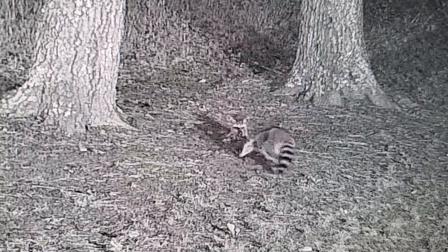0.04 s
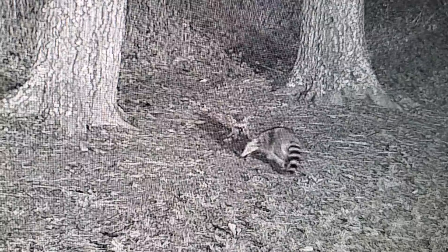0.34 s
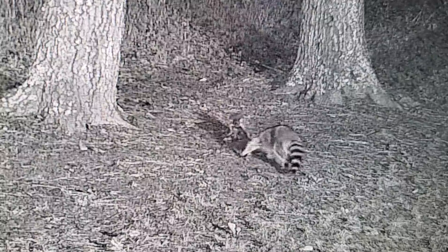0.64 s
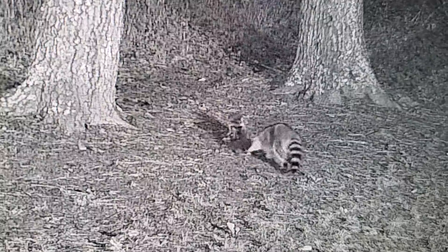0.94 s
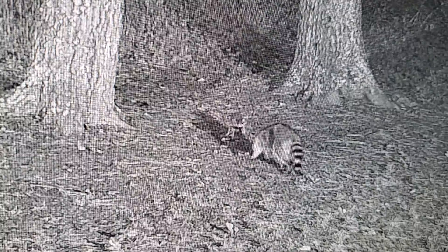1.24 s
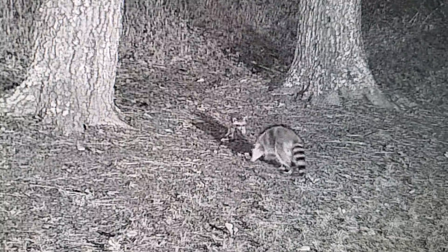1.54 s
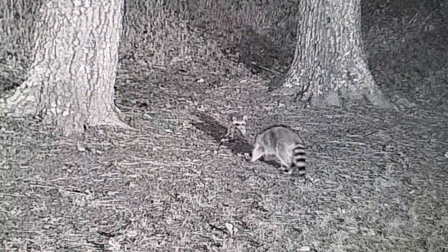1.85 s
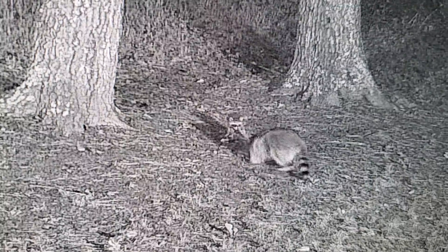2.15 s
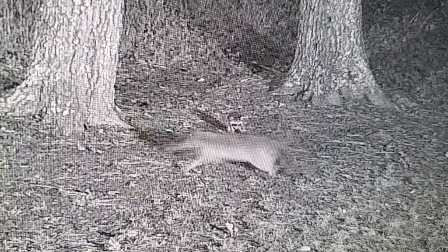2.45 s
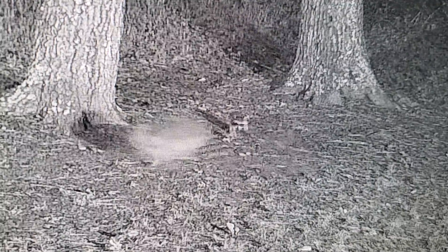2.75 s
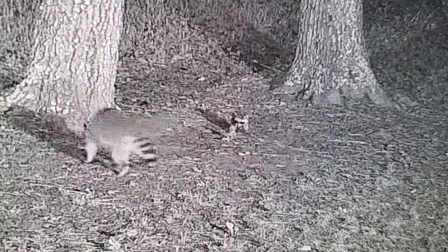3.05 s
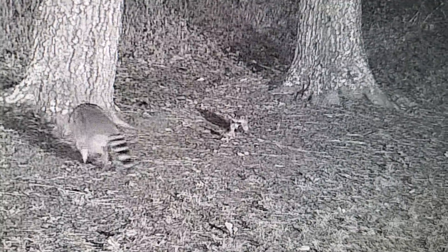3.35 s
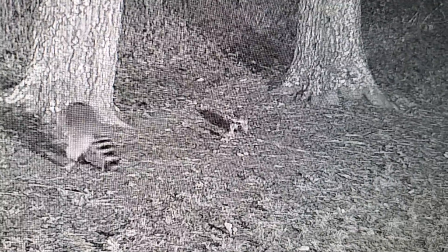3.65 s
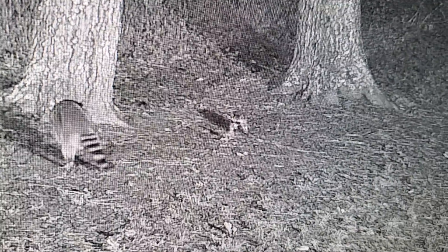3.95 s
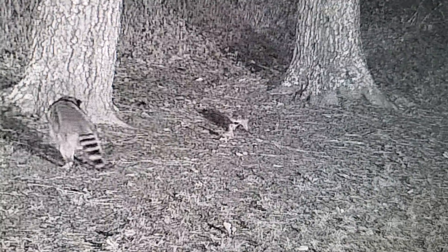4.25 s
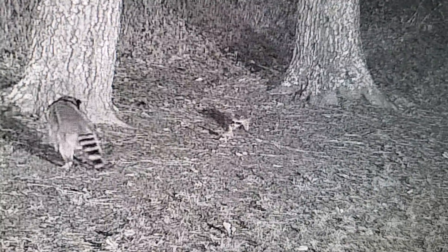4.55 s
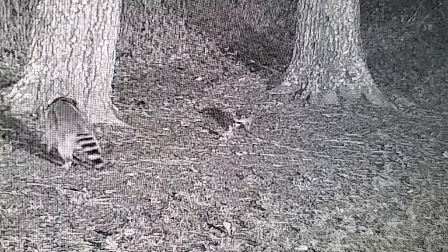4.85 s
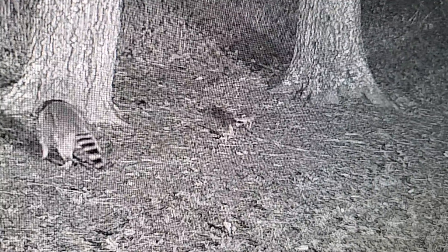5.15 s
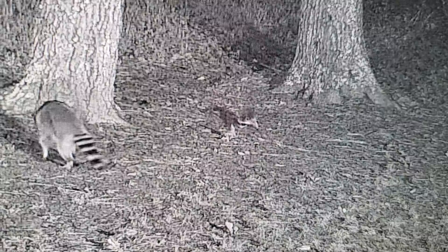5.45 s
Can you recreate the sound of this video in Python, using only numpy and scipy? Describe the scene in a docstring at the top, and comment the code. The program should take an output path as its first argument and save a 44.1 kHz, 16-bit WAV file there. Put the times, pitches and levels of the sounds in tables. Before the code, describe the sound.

Crickets chirp and trill all through this outdoor night sound, with a distant machine humming low underneath. Partway in come two short animal barks that trail off among the trees, the first breaking into yelps, the second rough and raspy. A raccoon's paws thud softly on the soil as it runs, with light leaf crackle and twig ticks, and then the crickets and hum go on as before.

```python
"""Night in a wood. From the start a far machine hums, and a chorus of crickets, each wing stroke a short
tone, swells about three times a second over steady trillers and lower tree crickets.
At 2.3 s an animal barks in hooting yelps, at 3.0 s again, hoarsely: a rough tone in throat noise.
From the first bark to about 4.8 s a raccoon bolts over the leaf litter with a few soft thumps.
Crickets and hum carry on to the end."""
import sys
import numpy as np
from scipy import signal
from scipy.fft import rfft, irfft, next_fast_len
from scipy.io import wavfile
from scipy.ndimage import map_coordinates

SR = 44100
rng = np.random.default_rng(int(sys.argv[2]) if len(sys.argv) > 2 else 0)


def generate_wav(signal):
    """Clip the signal to [-1, 1] and save it as 16-bit WAV at the path in sys.argv[1]."""
    frames = np.transpose(np.atleast_2d(signal))
    scaled = np.clip(frames, -1, 1) * 32767
    pcm = np.round(scaled).astype(np.int16)
    wavfile.write(sys.argv[1], SR, pcm)


N = 247401
TIME = np.arange(N) / SR

# Table levels are relative. pan: left minus right. lead: left phase lead. half: half width at 1/e.
# stereo coherence: f/Hz, coherence/1
COHERENCE = [(100, .99), (250, .96), (450, .9), (1000, .7), (1400, .6), (2000, .75), (4000, .65),
             (6500, .85)]
# stereo balance: f/Hz, pan/dB
STEREO_PAN = [(100, .2), (180, 1.3), (280, 2.4), (330, -4.5), (430, -9), (510, -3), (600, -2), (690, 7),
              (800, 0), (950, -6), (1300, 1), (2000, -2), (2900, -5), (4100, -1), (5000, -3), (6050, 4),
              (6250, -8), (6550, 6)]
# stereo phase: f/Hz, lead/rad
STEREO_LEAD = [(190, 0), (250, -.45), (320, -1.3), (430, .3), (480, -.3), (620, -.1), (750, -2.3),
               (1000, -5), (1400, -7.2), (2000, -8.3), (2900, -10), (3400, -8.5), (4200, -9), (5000, -10.3),
               (5900, -10), (6250, -14.2)]
# night air: f/Hz, density/dB
AIR_SPECTRUM = [(410, -35), (700, -14.5), (744, 2), (864, -10.5), (935, 3), (1000, -7), (1090, 2),
                (1160, -9), (1340, -5.5), (1560, -16.5), (1635, -14), (1720, -20), (1940, -6),
                (2310, -10.5), (2650, -4.5), (2870, -9), (3100, -11), (3250, -12), (3500, -21),
                (3680, -12.5), (4250, -13.5), (4380, -11.5), (4560, -9.5), (4700, -10), (4830, -17.5),
                (5050, -11), (5250, -11.5), (5500, -9), (5700, -13.5), (7410, -48), (12500, -120)]
# low rumble: f/Hz, density/dB
RUMBLE_SPECTRUM = [(15, -43.5), (25, -29), (54, -11.5), (114, -2.5), (140, -9), (233, -1), (263, -8),
                   (320, -18.5), (366, -13.5), (407, -19), (438, -14.5), (465, -16.5), (591, -23.5),
                   (860, -28), (900, -40.5), (1170, -57.5), (1980, -120)]
# faint top hiss: f/Hz, density/dB
HISS_SPECTRUM = [(8000, -22), (11500, -13), (14000, 8)]
# machine hum, two close lines beating near 6 Hz: f/Hz, level/dB
HUM_LINES = [(120, -44), (160.7, -48.5), (229.6, -46.5), (235.3, -37.5), (356, -57), (436.0, -50.5),
             (599, -58.5), (727.5, -63), (942.1, -62.5), (1061, -65.5), (1238, -71), (1292, -64)]
# machine resonances: f/Hz, width/Hz, level/dB
CASING_MODES = [(66.9, 8, -46.5), (109, 9.3, -48), (163.7, 5.8, -51), (198.3, 26, -48)]
# swells of the deepest drone: t/s, level/dB, half/s
DRONE_LEVELS = [(.19, -33, 0.12), (.46, -34.5, 0.047), (2.72, -38.5, 0.094), (3.61, -34.5, 0.069),
                (4.08, -36, 0.035)]
# steady crickets: f/Hz, strokes/Hz, level/dB, pan/dB, lead/rad
TRILLER_VOICES = [(6710, 49, -61.5, -2.5, 1), (6300, 64, -53.5, -8.5, -2.5), (5910, 51, -57, 6, 2),
                  (5850, 69, -56.5, 2, 2.5), (6030, 81, -58.5, 1, 3)]
# far crickets: f/Hz, level/dB, pan/dB, waver/Hz
FAR_WHINES = [(4640, -73.5, 9.5, 79), (4710, -74.5, 11.5, 34), (5100, -77.5, -1.5, 30), (5210, -74, -4, 36),
              (5770, -73, 1, 24), (6180, -57, 0.5, 21), (6380, -62.5, -1.5, 20), (6500, -58.5, 5, 18),
              (6560, -61, 7, 21), (6670, -58.5, 4, 18), (6790, -61.5, 1.5, 16), (6840, -61, 6.5, 14),
              (7000, -61, 1.5, 20)]
# farthest insects: f/Hz, density/dB
INSECT_SPECTRUM = [(3120, -56.5), (5300, -27.5), (5580, -18.5), (5890, -19.5), (6280, -8), (6480, 4.5),
                   (6690, -6), (7010, -19.5), (7260, -6), (7410, -31.5), (9630, -55), (16300, -120)]
# lone triller: t/s, level/dB
SOLO_LEVEL = [(0.0, -66.5), (2.3, -69), (2.55, -73.5), (3.25, -72.5), (3.35, -68.5), (3.77, -74),
              (3.84, -61), (3.93, -65), (4.02, -59), (4.12, -68), (4.22, -72), (4.4, -68), (4.6, -77),
              (5.12, -67), (5.61, -67)]
# trilling tree crickets: f/Hz, strokes/Hz, level/dB, pan/dB, lead/rad
TREE_LOW_VOICES = [(2806, 59, -5, -6, 2), (2858, 68, -0.5, -8.5, 1.7), (2950, 52, 1, -6.5, 0.55)]
# their trill: t/s, level/dB
TREE_TRILL_LEVEL = [(0, -60.5), (1.4, -60.5), (1.8, -64.5), (2.5, -61), (2.75, -57.5), (3.3, -59.5),
                    (4.5, -59.5), (5.61, -60)]
# higher tree crickets: f/Hz, strokes/Hz, level/dB, pan/dB, lead/rad
TREE_HIGH_VOICES = [(3246, 61, -66, -4.5, 1.5), (3347, 60, -67, -5.5, -3), (3420, 54, -68, -2.5, -1.5)]
# one tree cricket's clear chirps: t/s, level/dB, f/Hz
TREE_CHIRP_NOTES = [(0.205, -56, 2867), (0.309, -56.0, 2917), (0.431, -54.3, 2913), (0.572, -53, 2852),
                    (0.665, -54, 2927), (0.832, -60, 2867), (1.006, -55, 2845), (1.211, -52.5, 2926),
                    (1.334, -55, 2890), (1.491, -56.0, 2914), (2.024, -57, 2836), (2.472, -56.7, 2939),
                    (2.611, -57, 2875), (2.748, -51, 2919), (2.89, -53.5, 2859), (3.013, -56, 2915),
                    (3.126, -54.2, 2925), (3.276, -57, 2988), (3.359, -55.5, 2819), (3.567, -56.7, 2868),
                    (3.666, -55, 2863), (3.799, -53, 2868), (3.885, -52.5, 2868), (4.046, -55.5, 2888),
                    (4.292, -60.1, 2992), (4.483, -60, 2902), (4.731, -57, 2844), (4.898, -54.3, 2923),
                    (5.015, -56, 2872), (5.152, -55.8, 2860), (5.377, -54.5, 2836), (5.587, -55.6, 2979)]
# chorus, main group: f/Hz, strokes/Hz, level/dB, pan/dB, lead/rad
CHORUS_MAIN = [(6490, 68, -1.5, 10, -1.7), (6485, 42, -4, 6, -2), (6453, 57, -1, -2.5, -1.8),
               (6280, 64, -7.5, -8.5, -0.93), (6500, 115, -3.5, 11, -1.34)]
# chorus, high group: f/Hz, strokes/Hz, level/dB, pan/dB, lead/rad
CHORUS_HIGH = [(7017, 56, 0, 0, -2.5), (6730, 34, -1, 9.5, 2.5), (7080, 64, -1, -1, -2),
               (7044, 96, -7.5, -7, -2.5), (6750, 45, -1.5, 2, 1)]
# chorus chirps, longer and weaker when out of step: t/s, main level/dB, high level/dB, half/s
CHORUS_CHIRPS = [(0.01, -36.5, -37, 0.12), (0.326, -35.5, -39, 0.08), (0.63, -32.5, -41.5, 0.075),
                 (0.918, -33, -38.5, 0.086), (1.224, -33.5, -38.5, 0.088), (1.55, -39.5, -43.5, 0.12),
                 (1.824, -39.5, -38, 0.091), (2.075, -37, -41, 0.12), (2.374, -37, -45, 0.15),
                 (2.655, -36.5, -41, 0.095), (2.948, -40.5, -45, 0.2), (3.214, -34, -42, 0.091),
                 (3.555, -37, -41, 0.14), (3.796, -36, -40, 0.1), (4.105, -36.5, -40, 0.1),
                 (4.395, -36, -41, 0.098), (4.7, -38.5, -40, 0.16), (5.018, -37, -40, 0.12),
                 (5.292, -36.5, -36, 0.085), (5.564, -35, -36, 0.06)]
# paws landing: t/s, level/dB, f/Hz
PAW_FALLS = [(2.259, -27.5, 220), (2.335, -27, 210), (2.444, -28, 124), (2.989, -36, 118),
             (3.056, -29, 219), (3.091, -32, 121), (3.245, -26.5, 124), (3.279, -25, 118),
             (3.811, -28, 120), (4.615, -29.5, 225), (4.723, -30.5, 201), (4.823, -27, 212)]
# a sharp cricket click at 2.02 s, then twigs ticking and scraping: t/s, level/dB, half/s
CLICKS = [(2.02, -54, .0015), (2.902, -49, .004), (2.943, -49, .02), (3.033, -55, .008), (3.156, -51, .002),
          (3.222, -55, .002), (4.37, -58, .002), (4.87, -47, 0.0088)]
# click noise, cricket and twigs alike: f/Hz, density/dB
CLICK_SPECTRUM = [(2000, -26.5), (5000, -11), (7000, 8), (7900, -12), (8800, -42), (12000, -61)]
# leaves stirred: t/s, level/dB, half/s
LEAF_RUSTLES = [(0.2, -56, 0.06), (.46, -70, 0.032), (.67, -70, 0.066), (0.81, -65.5, 0.044),
                (1.1, -59, 0.095), (1.94, -65, 0.038), (2.203, -60, 0.032), (2.7, -66, 0.06),
                (2.91, -62, 0.052), (3.02, -59, 0.058), (3.22, -71.5, 0.076), (3.368, -57.5, 0.061),
                (3.56, -73, 0.03), (3.92, -64, .05), (4.032, -55.5, 0.068), (4.168, -55, 0.055),
                (4.25, -67.5, 0.054), (4.41, -64.5, 0.07), (4.68, -74, 0.067), (4.895, -65, 0.034),
                (5.08, -76.5, .05), (5.51, -56, 0.082)]
# leaf crackle: f/Hz, density/dB
LEAF_SPECTRUM = [(500, -19), (1300, -8), (3200, -3), (5000, -8), (7000, -12), (8300, -34.5), (10500, -17),
                 (15500, -24.5)]
# pitch of barks and yelps: t/s, f/Hz
VOICE_PITCH = [(2.22, 456.8), (2.3, 466.7), (2.335, 492), (2.37, 482.4), (2.41, 484), (2.6, 471),
               (2.95, 471), (3.02, 494.6), (3.07, 515), (3.3, 500)]
# throat noise, hooting bark: f/Hz, density/dB
HOOT_SPECTRUM = [(160, -48), (250, -15.5), (312, -20), (351, -6.5), (410, -9), (484, -7), (550, -14),
                 (631, -23.5), (690, -18.5), (820, -25.5), (925, -15), (1020, -25.5), (1250, -30.5),
                 (1380, -23.5), (1520, -32), (1720, -47), (1980, -27), (2200, -38.5), (2350, -35),
                 (2650, -43.5), (3770, -79.5), (6380, -120)]
# throat noise, hoarse bark: f/Hz, density/dB
HOARSE_SPECTRUM = [(130, -32), (230, 3.5), (303, -6), (372, -9.5), (440, -1), (513, 3), (572, -4),
                   (782, -8.5), (880, -7.5), (1020, -12.5), (1400, -10), (1560, -22.5), (1660, -26),
                   (1820, -34), (1950, -15), (2100, -22), (2330, -19.5), (2600, -39), (2900, -42.5),
                   (3770, -59.5), (6380, -120)]
# barks: t at full force/s, hold/s, fade/(dB/s), tone/dB, rasp/dB, jitter/1, flutter/dB, mouth lag/s
BARK_CALLS = [(2.308, 0.085, 150, -41.5, -27.5, 0.02, 3, .008),
              (2.999, 0.029, 73.5, -40.5, -27, 0.029, 3, -0.0029)]
# voice catching and sounding clear: t/s, half/s, tone/dB, octave/dB
YELP_NOTES = [(2.247, 0.016, -35, -58.5), (2.294, 0.013, -28.5, -34.5), (2.323, 0.016, -22.5, -52),
              (2.35, 0.019, -21.5, -35), (2.385, 0.016, -50, -32.5), (2.407, 0.012, -29.5, -29),
              (2.439, 0.012, -37, -46), (2.486, 0.024, -37, -47.5), (2.521, 0.017, -40, -40),
              (2.579, 0.015, -50, -49), (2.94, 0.02, -40.5, -58), (2.977, 0.016, -36.5, -53),
              (3.021, 0.01, -31.5, -41), (3.059, 0.014, -36, -46), (3.082, 0.013, -32, -50),
              (3.289, 0.014, -58, -47.5)]
# microphone treble roll-off: f/Hz, gain/dB
ROLL_OFF = [(7100, 1.5), (7400, -9), (7900, -32.5), (9000, -55)]


def amp(db):
    """dB to gain."""
    return 10 ** (np.asarray(db) / 20)


def unit(x):
    """Scale to rms 1."""
    return x / np.sqrt(np.mean(np.abs(x) ** 2) + 1e-20)


def along(points, hz):
    """Interpolate (f/Hz, value) on a log axis."""
    f, v = np.transpose(points)
    return np.interp(np.log(hz + 1), np.log(f + 1), v)


def curve(points):
    """Interpolate (t/s, value) per sample."""
    return np.interp(TIME, *np.transpose(points))


def wobble(rate_hz):
    """Smooth random curve, knots at rate_hz."""
    return map_coordinates(rng.standard_normal(int(N * rate_hz / SR) + 4), [TIME * rate_hz])


def swells(rows):
    """Gaussian swells (t/s, level/dB, half/s), summed in power."""
    return np.sqrt(sum((amp(db) * np.exp(-((TIME - t_s) / half_s) ** 2)) ** 2 for t_s, db, half_s in rows))


def envelope(t_s, hold_s, rise_db_per_s, fade_db_per_s):
    """Rise to 1 at t_s, hold, fade."""
    before_s, after_s = np.maximum(t_s - TIME, 0), np.maximum(TIME - t_s - hold_s, 0)
    return amp(-rise_db_per_s * before_s - fade_db_per_s * after_s)


def filtered(x, response):
    """FFT filter, gain response(hz)."""
    size = next_fast_len(N + SR // 2)
    return irfft(rfft(x, size) * response(np.fft.rfftfreq(size, 1 / SR)), size)[..., :N]


def stereo_response(hz):
    """Gain and phase at the two microphones."""
    sides = np.array([[.5], [-.5]])
    return amp(sides * along(STEREO_PAN, hz)) * np.exp(1j * sides * along(STEREO_LEAD, hz))


def noise(spectrum):
    """Partly coherent stereo noise, rms 1."""
    def mid_side(hz):
        angle_rad = np.arccos(np.clip(along(COHERENCE, hz), -1, 1)) / 2
        return amp(along(spectrum, hz)) * [np.cos(angle_rad), np.sin(angle_rad)]
    mid, side = filtered(rng.standard_normal((2, N)), mid_side)
    return unit(filtered(np.array([mid + side, mid - side]), stereo_response))


def tone(hz, pan_db, lead_rad):
    """Stereo sine on a pitch curve, rms 1 before panning."""
    sides = np.array([[.5], [-.5]])
    return np.sqrt(2) * amp(sides * pan_db) * np.sin(2 * np.pi * np.cumsum(hz) / SR + sides * lead_rad)


def woods(x, wet_db, t60_s):
    """Add scatter from trunks and leaves."""
    t_s = TIME[:SR // 2]
    tail = rng.standard_normal((2, len(t_s))) * amp(-60 * t_s / t60_s)
    tail /= np.linalg.norm(tail, axis=1, keepdims=True)
    return x + amp(wet_db) * signal.fftconvolve(x, tail, axes=1)[:, :N]


def night_air():
    """Surging rumble under a soft hiss."""
    rumble = amp(-37.5 + 2.5 * np.tanh(wobble(10))) * noise(RUMBLE_SPECTRUM)
    return rumble + amp(-50 + .42 * wobble(5.2)) * noise(AIR_SPECTRUM)


def machine():
    """Far machine: swelling drone, wavering hum lines, rumble in narrow resonances."""
    def resonance(centre_hz, width_hz):
        return unit(filtered(rng.standard_normal(N), lambda hz: np.exp(-((hz - centre_hz) / width_hz) ** 2)))
    drone = swells(DRONE_LEVELS) * np.sin(2 * np.pi * np.cumsum(64.7 + 1.6 * wobble(12)) / SR)
    hum = np.zeros((2, N))
    for hz, db in HUM_LINES:
        gain = amp(db - 4 + .55 * wobble(8.2))
        hum += gain * tone(hz + .51 * wobble(12), along(STEREO_PAN, hz), along(STEREO_LEAD, hz))
    casing = sum(amp(db) * resonance(hz, width_hz) for hz, width_hz, db in CASING_MODES)
    return drone + hum + filtered(casing, stereo_response)


def stridulate(voices, scatter, droop, uneven_db):
    """One short, sagging tone per wing stroke; scatter and droop are fractions of the pitch."""
    song = np.zeros((2, N))
    for hz, stroke_hz, db, pan_db, lead_rad in voices:
        stroke, part = np.divmod(np.cumsum(stroke_hz * np.exp(.1 * wobble(20))) / SR, 1)
        detune, size = rng.standard_normal((int(stroke[-1]) + 1, 2))[stroke.astype(int)].T
        pitch_hz = hz * (1 + scatter * detune - droop * (part - .5))
        song += amp(db + uneven_db * size) * np.sin(np.pi * part) ** 2 * tone(pitch_hz, pan_db, lead_rad)
    return song


def trillers():
    """Crickets that never pause: one stands apart, the farthest blur to whines and hiss."""
    near = woods(stridulate(TRILLER_VOICES, scatter=.007, droop=.037, uneven_db=3), wet_db=-6, t60_s=.23)
    far = np.zeros((2, N))
    for hz, db, pan_db, waver_hz in FAR_WHINES:
        gain = amp(db + 2.2 * wobble(7.6) + 2.4 * wobble(50))
        far += gain * tone(hz + waver_hz * wobble(90), pan_db, -1.44)
    strokes = 1 + .8 * np.sin(2 * np.pi * np.cumsum(58 + 4 * wobble(6.5)) / SR)
    solo_gain = amp(curve(SOLO_LEVEL) - 2.5 + 1.8 * wobble(40))
    solo = solo_gain * strokes * tone(4998 + 25 * wobble(110), -9, -1.3)
    return near + far + woods(solo, wet_db=-1.5, t60_s=.21) + amp(-53.5) * noise(INSECT_SPECTRUM)


def tree_crickets(chirp_half_s=.023):
    """Lower, purer chirps from the branches over soft trills, blurred by distance."""
    t_s, _, hz = np.transpose(TREE_CHIRP_NOTES)
    chirp_gain = swells((at_s, db - .5, chirp_half_s) for at_s, db, _ in TREE_CHIRP_NOTES)
    chirp_gain *= amp(1.2 * wobble(140))
    chirps = chirp_gain * tone(np.interp(TIME, t_s, hz) + 20 * wobble(170), -5.5, 1.9)
    trill = stridulate(TREE_LOW_VOICES, scatter=.012, droop=.0062, uneven_db=4)
    trill = unit(woods(trill, wet_db=-.5, t60_s=.16))
    trill *= amp(curve(TREE_TRILL_LEVEL) + .75 * wobble(24))
    low = woods(chirps + trill, wet_db=-11, t60_s=.25)
    high = stridulate(TREE_HIGH_VOICES, scatter=.012, droop=.013, uneven_db=2.5)
    return low + woods(high, wet_db=.5, t60_s=.15)


def chorus():
    """Two groups of crickets chirp together; stragglers fill the lulls."""
    t_s, main_db, high_db, half_s = np.transpose(CHORUS_CHIRPS)
    def gain(db, lull_db):
        return np.hypot(swells(zip(t_s, db, half_s)), amp(lull_db)) * amp(.85 * wobble(25))
    main = stridulate(CHORUS_MAIN, scatter=.0043, droop=.028, uneven_db=2)
    main = unit(woods(main, wet_db=-5.5, t60_s=.72))
    high = stridulate(CHORUS_HIGH, scatter=.0036, droop=.009, uneven_db=2.5)
    high = unit(woods(high, wet_db=-4.5, t60_s=.3))
    return gain(main_db - 2.5, lull_db=-48) * main + gain(high_db - 5.5, lull_db=-64.5) * high


def clicks():
    """Short noise bursts: one sharp cricket click, then twigs ticking and scraping."""
    gain = sum(amp(db) * np.exp(-np.abs(TIME - t_s) / half_s) for t_s, db, half_s in CLICKS)
    return gain * noise(CLICK_SPECTRUM)


def raccoon(attack_s=.0029, t60_s=.14):
    """Paws thud on soft soil; dry leaves crackle faintly."""
    thuds = np.zeros(N)
    for t_s, db, hz in PAW_FALLS:
        age_s = np.maximum(TIME - t_s, 0)
        gain = amp(db + 5.5 - 60 * age_s / t60_s) * (1 - np.exp(-age_s / attack_s))
        thuds += gain * np.sin(2 * np.pi * hz * age_s)
    stir = amp(-89) + swells(LEAF_RUSTLES)
    grains = rng.standard_normal((2, N)) * (rng.random(N) < .04) * amp(3.5 * np.tanh(wobble(90)))
    leaves = unit(filtered(grains, lambda hz: amp(along(LEAF_SPECTRUM, hz))))
    return thuds + stir * leaves * amp([[-1.5], [4.5]])


def yelps(jitter=.014, octave_hz=940):
    """Short clear tones on the bark's pitch; their octave rings longest among the trees."""
    t_s, half_s, tone_db, octave_db = np.transpose(YELP_NOTES)
    pitch_hz = curve(VOICE_PITCH) * (1 + jitter * wobble(130))
    flutter = amp(1.2 * wobble(170))
    low = flutter * swells(zip(t_s, tone_db, half_s)) * tone(pitch_hz, -3.5, -.2)
    high = flutter * swells(zip(t_s, octave_db, half_s)) * tone(octave_hz + 10 * wobble(140), -8.5, 1.7)
    return woods(low, wet_db=-16, t60_s=.55) + woods(high, wet_db=-12, t60_s=1)


def bark(call, spectrum, mouth_hz=800, break_s=2.384, break_half_s=.013):
    """Rough voiced tone in throat noise that brightens as the mouth opens."""
    t_s, hold_s, fade_db_per_s, tone_db, rasp_db, jitter, flutter_db, lag_s = call
    pitch_hz = curve(VOICE_PITCH) * (1 + jitter * wobble(130))
    undertone = amp(-5) * tone(pitch_hz * .75, -6.5, -.91)  # uneven vibration
    voiced = amp(tone_db - 5 + flutter_db * wobble(150)) * (tone(pitch_hz, -1, -.1) + undertone)
    rasp = amp(rasp_db + .99 * wobble(70)) * noise(spectrum)
    dull = filtered(rasp, lambda hz: 1 / (1 + (hz / mouth_hz) ** 8))
    chest = envelope(t_s, hold_s, 237.5, fade_db_per_s)
    chest *= amp(-13.5 * swells([(break_s, 0, break_half_s)]))  # dips as the voice flips to the octave
    mouth = amp(1.5) * envelope(t_s + lag_s, hold_s, 342, fade_db_per_s)
    return chest * (voiced + dull) + mouth * (rasp - dull)


def barks():
    """First bark breaks into yelps, second is mostly rasp; both trail off among the trees."""
    calls = bark(BARK_CALLS[0], HOOT_SPECTRUM) + bark(BARK_CALLS[1], HOARSE_SPECTRUM)
    return woods(calls, wet_db=-11.5, t60_s=.78) + yelps()


def scene():
    """Cricket song, machine, air and barks through the roll-off; clicks, raccoon, top hiss bypass it."""
    mix = chorus() + trillers() + tree_crickets() + machine() + night_air() + barks()
    hiss = amp(-78) * noise(HISS_SPECTRUM)
    return filtered(mix, lambda hz: amp(along(ROLL_OFF, hz))) + clicks() + raccoon() + hiss


def record(dry):
    """Brick-wall low-pass, 15750 Hz."""
    return filtered(dry, lambda hz: hz < 15750)


dry = scene()
out = record(dry)
generate_wav(out)
```